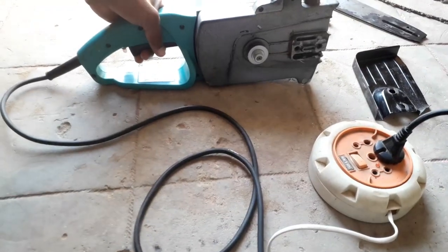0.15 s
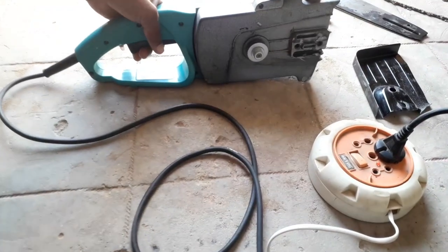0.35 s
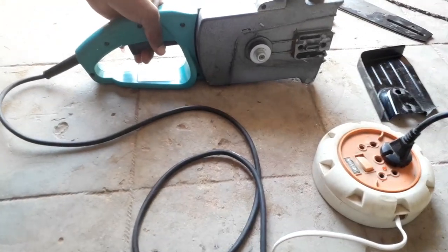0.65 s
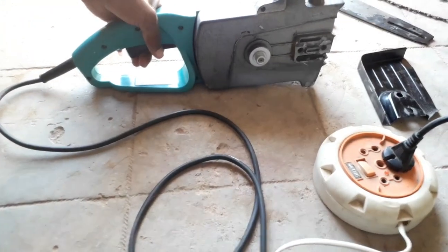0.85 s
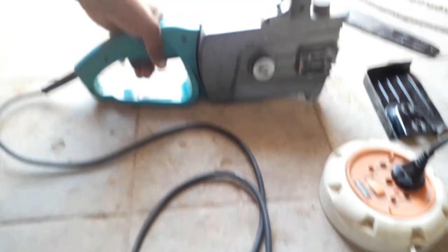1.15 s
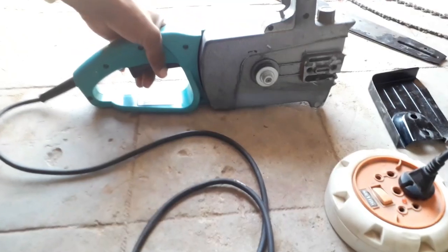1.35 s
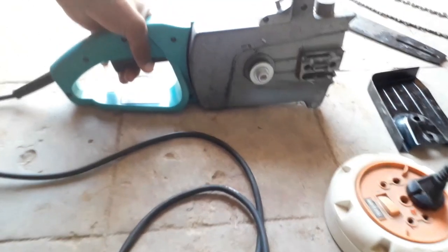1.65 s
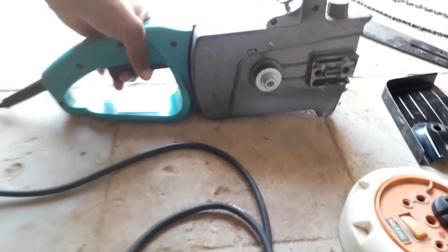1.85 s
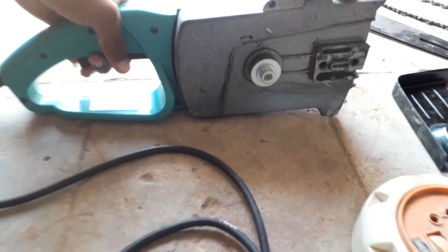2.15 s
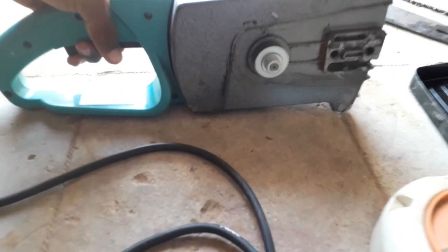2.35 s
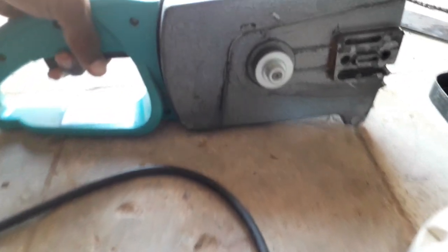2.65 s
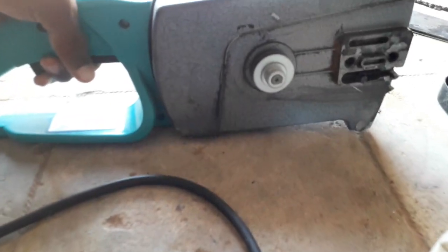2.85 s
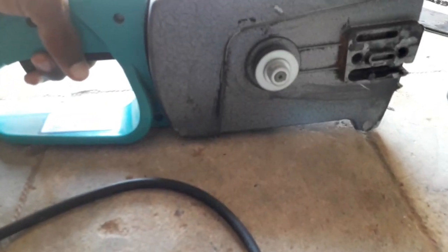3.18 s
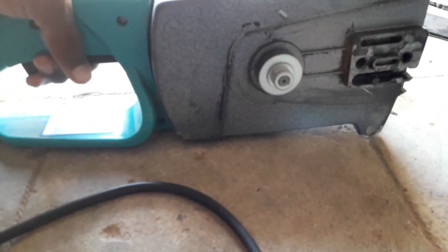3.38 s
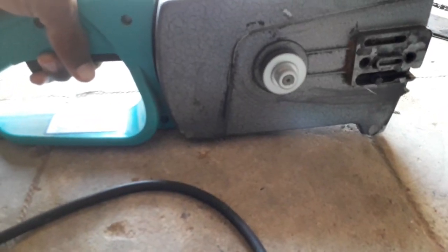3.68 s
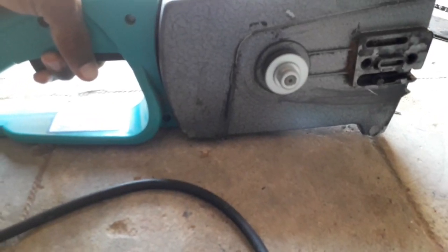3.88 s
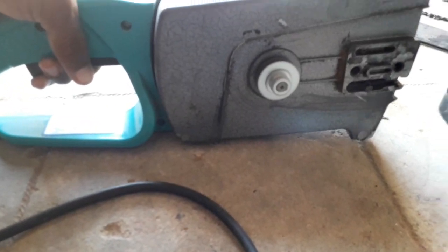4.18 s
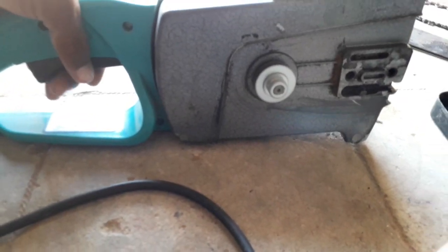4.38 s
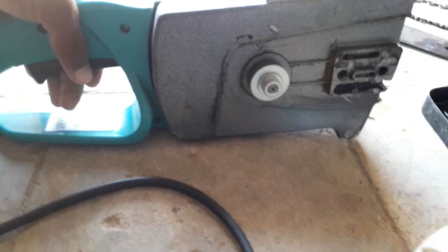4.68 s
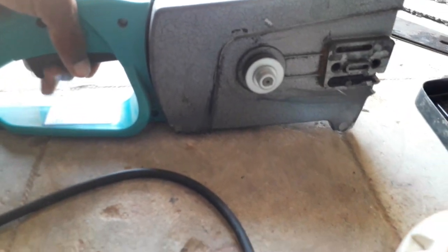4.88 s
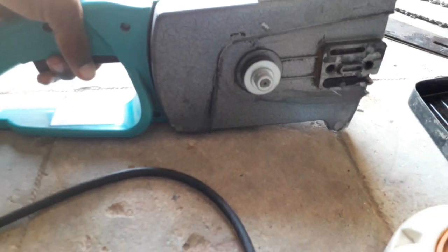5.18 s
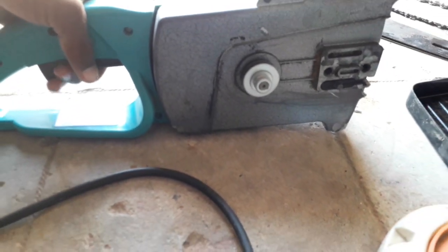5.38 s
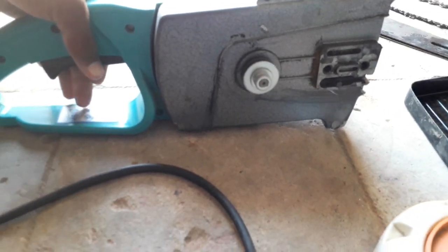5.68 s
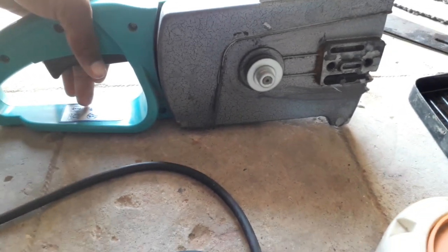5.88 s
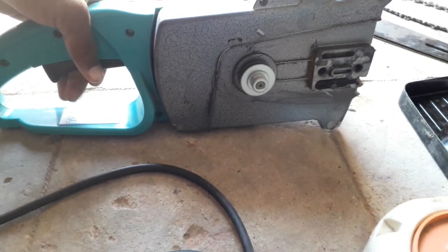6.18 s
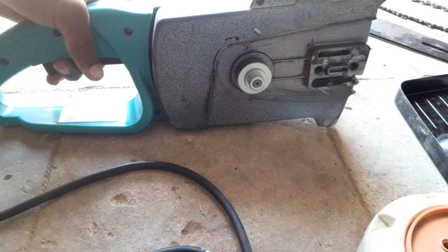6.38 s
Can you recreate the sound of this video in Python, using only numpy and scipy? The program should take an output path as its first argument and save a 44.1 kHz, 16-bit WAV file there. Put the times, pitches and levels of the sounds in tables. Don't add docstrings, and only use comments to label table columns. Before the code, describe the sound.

A mains saw motor runs free in a hard-walled room, heard by a close handheld microphone. First a falling whirr with bright irregular metallic clacks; then a sudden restart climbs to a fast, steady rush of fan air, gear rattle and thin whine, with a few soft low air puffs on the microphone. Released, it sinks in pitch and strength, and loose gear knocks return to the end. Short room reflections follow the clatter.

```python
import sys
import numpy as np
from scipy import signal
from scipy.io import wavfile
from scipy.ndimage import uniform_filter1d

SR = 44100
rng = np.random.default_rng(int(sys.argv[2]) if len(sys.argv) > 2 else 0)


def dump_mix(stems):
    frames = np.atleast_2d(stems).T
    limited = np.clip(frames, -1, 1)
    pcm = np.round(limited * 32767).astype(np.int16)
    wavfile.write(sys.argv[1], SR, pcm)


def voltage_ratio(decibels):
    exponent = np.asarray(decibels, float) / 20
    return 10 ** exponent


N = 288061
POWER_ON_S, POWER_OFF_S = 2.256, 4.281
TOP_TURNS_PER_S = 337


def rms_one(x):
    return x / np.sqrt(np.mean(x ** 2) + 1e-20)


def in_time(rows):
    s, value = np.transpose(rows)
    return np.interp(np.arange(N) / SR, s, value)


def drift(rate):
    r = np.exp(-80 * np.pi * rate / SR)
    slow = signal.lfilter([1], [1, -2 * r, r * r], rng.standard_normal(N // 40 + 2002))[2000:]
    return np.interp(np.arange(N) / 40, np.arange(len(slow)), rms_one(slow))


def decay(x, decay_s, gain=1):
    return signal.lfilter([gain], [1, -np.exp(-1 / (decay_s * SR))], x + 1e-18)


def resonance(x, hz, width_hz):
    r = np.exp(-np.pi * width_hz / SR)
    poles = [1, -2 * r * np.cos(2 * np.pi * hz / SR), r * r]
    return signal.lfilter(np.array([1, 0, -1]) * (1 - r * r) / 2, poles, x + 1e-18)


def bandpass(x, order, low_hz, high_hz):
    return signal.sosfilt(signal.butter(order, [low_hz, high_hz], "band", fs=SR, output="sos"), x)


def banded_noise(spectrum, patchy_db):
    hz, level_db = np.transpose(spectrum)
    edges = hz[0] * 2 ** np.arange(0, np.log2(hz[-1] / hz[0]), 1 / 3)
    together, white = drift(3.4), rng.standard_normal((2, N))
    out = 0
    for k, (low, high) in enumerate(zip(edges, edges[1:])):
        colour_db = np.interp(np.log(low * high) / 2, np.log(hz), level_db)
        flicker_db = patchy_db * (0.44 * together + drift(22))
        out = out + voltage_ratio(colour_db + flicker_db) * bandpass(white[k % 2], 2, low, high)
    return rms_one(out)


def coast(start_turns_per_s, s):
    equal_turns_per_s, rate_per_s = 171, .2125
    return equal_turns_per_s * np.tan(np.arctan(start_turns_per_s / equal_turns_per_s) - rate_per_s * s)


def speed_lack(s):
    surge_share, surge_s, settle_s = .332, .099, .4
    surge = (1 + s / surge_s) * np.exp(-s / surge_s)
    return surge_share * surge + (1 - surge_share) * np.exp(-s / settle_s)


def rotor():
    t, start_turns_per_s = np.arange(N) / SR, 163.5
    on_s, off_s = np.maximum(t - POWER_ON_S, 0), np.maximum(t - POWER_OFF_S, 0)
    restart = coast(start_turns_per_s, POWER_ON_S)

    def rise(s):
        return TOP_TURNS_PER_S - (TOP_TURNS_PER_S - restart) * speed_lack(s)

    powered = (t > POWER_ON_S) & (t < POWER_OFF_S)
    coasting = np.where(t <= POWER_ON_S, coast(start_turns_per_s, t),
                        coast(rise(POWER_OFF_S - POWER_ON_S), off_s))
    speed = np.where(powered, rise(on_s), coasting)
    return speed, uniform_filter1d(powered * speed_lack(on_s), size=800, origin=399)


# time [s], level [dB].
NEARNESS = [(0, 3.5), (.6, 3), (1.15, 5), (1.3, 3), (2.2, 4), (2.5, 1.8), (3.2, 0.46), (4.3, -0.57),
            (5.0, -0.5), (5.8, -1.9), (6.3, -3.5), (6.53, 3.5)]


def level(speed, torque, full_db, halving_db, torque_db, near_share):
    slowing_db = halving_db * np.log2(TOP_TURNS_PER_S / speed)
    return full_db - slowing_db + torque_db * torque + near_share * in_time(NEARNESS)


def wheel_angle(speed):
    pinion_teeth, wheel_teeth, high_side_s = 10, 59, (2.14, 6.015)
    turns = np.cumsum(speed) / SR
    first, second = turns[(np.array(high_side_s) * SR).astype(int)]
    zero = np.where(np.arange(N) < POWER_OFF_S * SR, first, second)
    return 2 * np.pi * (turns - zero) * pinion_teeth / wheel_teeth


# centre [Hz], width [Hz], level for a knock [dB], level for the rattle [dB].
HOUSING = [(1124, 104, -11.5, -9), (1490, 104, -3, -9), (1812, 463, -2.5, -2.5), (2480, 990, -3, -2),
           (3217, 453, 3, 3.5), (3950, 443, 4, 4.5), (4992, 790, 6.5, 3.5), (5400, 800, 5.5, -4),
           (6320, 475, -2.5, -5.5), (7040, 290, -7, -3.5), (8370, 1360, -8.5, -9.5), (9720, 690, -5.5, -7),
           (10830, 2800, -15, -13.5)]


def housing(blows, column):
    rings = 0
    for k, (x, mode) in enumerate(zip(blows, HOUSING)):
        rings = rings + (-1) ** k * voltage_ratio(mode[column]) * resonance(x, *mode[:2])
    return bandpass(rings, 2, 900, 10650)


def rattle(speed, rattle_db):
    t, mains_hz, runout_db, mains_db = np.arange(N) / SR, 50, 1.1, 1.5
    powered = (t > POWER_ON_S) & (t < POWER_OFF_S)
    swing_db = runout_db * np.log2(TOP_TURNS_PER_S / speed) * np.cos(wheel_angle(speed))
    swing_db += mains_db * powered * np.cos(4 * np.pi * mains_hz * t)
    swing_db += 0.5 * drift(45)
    born = rng.random(N) < 41 * speed / SR
    sizes = voltage_ratio(2.5 * np.minimum(rng.exponential(1, N), 3)) * rng.choice([-1, 1], N)
    contacts = born * sizes / np.sqrt(speed) * voltage_ratio(swing_db)
    rubbing = .5 * rng.standard_normal(N)
    return voltage_ratio(rattle_db) * rms_one(housing([rms_one(contacts) + rubbing] * len(HOUSING), 3))


# time [s], peak level [dB].
HARD_KNOCKS = [(0.2449, 0), (0.2579, 1), (0.3287, 0), (0.3696, 0), (0.4509, 0), (0.7447, -1),
               (0.7519, -1), (0.8859, 1), (0.8984, -1), (0.9388, -3), (1.062, -1), (1.1243, 0),
               (1.1648, -1), (1.1914, 0), (1.1974, 0), (1.3728, -2), (1.4436, -2), (1.4541, -1),
               (1.517, -1), (1.5808, -1), (1.6487, -3), (1.6741, 0), (1.7414, 0), (1.8163, -1),
               (1.8337, -2), (2.0248, -1), (2.0408, 1), (2.1171, -3), (2.1385, 0), (2.164, -4),
               (2.2333, -3), (2.2503, -2), (2.2847, 0), (2.3156, 1), (2.3344, 1), (2.3864, 1),
                   (2.4044, 1), (2.4473, 1), (5.235, -1), (5.2804, 0), (5.3014, -1), (5.3517, -2),
                   (5.5593, 0), (5.6481, -1), (5.664, 0), (5.7224, 0), (5.7364, -1), (5.7997, 1),
                   (5.8074, -1), (5.8306, 0), (5.8995, 0), (5.9125, -1), (5.9454, 1), (5.9768, -3),
                   (6.0132, 1), (6.0935, -2), (6.1484, 1), (6.4088, -3), (6.4664, -3), (6.5106, 0)]


def knock_times(speed, torque):
    knocks_per_s, jitter_turns, spread_db, top_db = 80, .16, 2.3, -8
    wheel_swing_db, torque_db, meshed_s = 2.0, 6.0, 2.75
    turns = np.cumsum(speed) / SR
    count = int(turns[-1])
    luck = rng.random(count)
    jitter, size = rng.standard_normal((2, count))
    at = np.interp(np.arange(count) + .5 + jitter_turns * jitter, turns, np.arange(N)).astype(int)
    swing_db = wheel_swing_db * np.log2(TOP_TURNS_PER_S / speed) * (np.cos(wheel_angle(speed)) - .5)
    usual_db = level(speed, torque, full_db=-6.5, halving_db=1.3, torque_db=torque_db, near_share=0.2)
    peak_db = (usual_db + swing_db)[at] + spread_db * size
    peak_db = np.minimum(peak_db, top_db + torque_db * torque[at])
    hard_s, hard_db = np.transpose(np.array(HARD_KNOCKS))
    s = at / SR
    free = np.abs(s[:, None] - hard_s).min(axis=1) > .005
    loose = (s < meshed_s) | (s > POWER_OFF_S)
    keep = free & loose & (luck < knocks_per_s / speed[at])
    return np.r_[s[keep], hard_s + .001], np.r_[peak_db[keep], hard_db - 3.2]


def knocks(s, peak_db):
    gain_db, bounce_s, bounce_db = 4, .0009, -2
    at = np.clip(((s - .0007) * SR).astype(int), 18, N - 99)
    draws = rng.standard_normal((len(s), len(HOUSING) + 2))
    strengths = voltage_ratio(peak_db + gain_db) * voltage_ratio(1.5 * draws[:, 2:]).T
    bounce = at + (bounce_s * SR * (1 + .1 * draws[:, 0])).astype(int)
    blows = np.zeros((len(HOUSING), N))
    blows[:, at] = strengths
    blows[:, at - 18] = .2 * strengths
    blows[:, bounce] = strengths * voltage_ratio(bounce_db + 1.5 * draws[:, 1])
    shiver = decay(blows.mean(axis=0), .003, .02)
    blows += shiver * rng.standard_normal(N)
    unit_peak = np.abs(housing([signal.unit_impulse(512)] * len(HOUSING), 2)).max()
    return housing(blows, 2) / unit_peak


# delay [s], level [dB].
ECHOES = [(.0024, -12), (.0066, -12), (.0095, -15)]


def room(x):
    t60_s, tail_db, wall_cut_hz = .3, -13, 4500
    out, dull = x.copy(), np.exp(-2 * np.pi * wall_cut_hz / SR)
    for delay_s, level_db in ECHOES:
        lag = round(delay_s * SR)
        out[lag:] += voltage_ratio(level_db) * x[:-lag]
    for k, lag in enumerate((rng.uniform(0.0098, .035, 8) * SR).astype(int)):
        loop, gain, state = x.copy(), voltage_ratio(-60 * lag / SR / t60_s), [0.]
        for i in range(lag, N, lag):
            back, state = signal.lfilter([gain * (1 - dull)], [1, -dull], loop[i - lag:i], zi=state)
            loop[i:i + lag] += back[:N - i]
        out += voltage_ratio(tail_db) * (loop - x) * (-1) ** k
    return out


def gears(speed, torque):
    knock_room_share = .55
    blows = knocks(*knock_times(speed, torque))
    rattle_db = level(speed, torque, full_db=-9.5, halving_db=4.5, torque_db=8.5, near_share=0.64)
    to_room = voltage_ratio(-7.0) * rattle(speed, rattle_db) + knock_room_share * blows
    return room(to_room) + (1 - knock_room_share) * blows


# frequency [Hz], density [dB per Hz].
ROAR = [(15, -61), (25, -78), (64, -26), (231, -10.5), (325, -8), (374, -3), (438, -2.5), (884, -5),
        (2090, -7.5), (2220, -35), (3000, -8), (3900, -30), (6600, -120)]


def fan_roar(roar_db):
    return voltage_ratio(roar_db + 2.0) * banded_noise(ROAR, patchy_db=0.13)


# centre [Hz], width [Hz], level over the roar when coasting [dB].
SHELL = [(462, 43, -1), (602, 91, 1)]


def shell(speed, roar_db):
    coasting = np.clip(1.2 - speed / speed.max(), 0, 1)
    out = 0
    for hz, width_hz, level_db in SHELL:
        hollow = rms_one(resonance(rng.standard_normal(N), hz, width_hz))
        out = out + voltage_ratio(roar_db + level_db) * coasting * hollow
    return out


# frequency [Hz], density [dB per Hz].
HISS = [(1470, -76), (2500, -19.5), (3010, -2.5), (5350, -2), (6010, -16), (7470, -8), (11600, -15.5),
        (14900, -20.5), (16000, -28)]


def fan_hiss(speed, torque):
    hiss_db = level(speed, torque, full_db=-20.5, halving_db=16, torque_db=0, near_share=1.4)
    return voltage_ratio(hiss_db + 11.5) * banded_noise(HISS, patchy_db=0.5)


def lit_db(hz, peaks):
    return sum(boost_db / (1 + (2 * (hz - top_hz) / width_hz) ** 2) for top_hz, width_hz, boost_db in peaks)


# centre [Hz], width [Hz], boost [dB].
FLOOR_PANEL = [(127, 13, 21), (150, 30, -5), (188, 35, 8)]


def hum(speed):
    phase = 2 * np.pi * np.cumsum(speed) / SR
    hum_db = -32 - 22 * np.log2(speed.max() / speed) + lit_db(speed, FLOOR_PANEL)
    return np.sqrt(2) * voltage_ratio(hum_db + 1.5 * drift(6)) * np.sin(phase)


# cycles per turn, level at full speed [dB], loss per halving of speed [dB].
WHINES = [(32, -38, 1.5), (36, -33.5, 14), (48, -39, 11), (64, -39.5, 1.5), (96, -38, 7)]
# centre [Hz], width [Hz], boost [dB].
WHINE_PEAKS = [(4800, 900, 6), (6150, 400, 9), (9000, 450, 10), (10100, 600, 6), (11600, 500, 3),
               (15000, 6000, -11)]
# time [s], level
# [dB].
BRUSH_END = [(0, 3), (.38, 6), (.55, 3), (2.36, -1), (2.52, 12), (2.75, 2), (3.1, 4), (4.45, 4), (4.7, -2),
             (5.3, -3), (5.5, 1), (5.65, -5), (6.53, -4)]


def whines(speed):
    phase = 2 * np.pi * np.cumsum(speed) / SR
    halvings, trim_db = np.log2(speed.max() / speed), in_time(BRUSH_END)
    out = np.zeros(N)
    for cycles, level_db, halving_db in WHINES:
        hz = cycles * speed
        line_db = level_db + trim_db - halving_db * halvings + lit_db(hz, WHINE_PEAKS) + 2.5 * drift(25)
        out += voltage_ratio(line_db) * (hz < .4 * SR) * np.sin(cycles * phase + 1.5 * drift(20))
    return np.sqrt(2) * out


# time [s], peak level [dB].
PUFFS = [
    (3.199, -23),
    (3.399, -35),
    (3.589, -28),
    (3.659, -28),
    (5.559, -42),
]


def puffs():
    starts = np.zeros(N)
    for s, peak_db in PUFFS:
        starts[round(s * SR)] = voltage_ratio(peak_db + 1)
    shape = signal.lfilter([.005], [1, -.995], decay(starts, 0.011))
    return rms_one(resonance(rng.standard_normal(N), 80, 120)) * shape


# frequency [Hz], density [dB per Hz].
BACKGROUND = [(18, -38), (30, -25), (97, 2), (183, 17), (268, -20), (400, -18), (520, -32), (880, -120)]


def background():
    return voltage_ratio(-57 - 0.5) * banded_noise(BACKGROUND, patchy_db=5.0)


def scene():
    speed, torque = rotor()
    roar_db = level(speed, torque, full_db=-22.5, halving_db=12, torque_db=4.5, near_share=0.45)
    air = fan_roar(roar_db) + shell(speed, roar_db) + fan_hiss(speed, torque) + puffs()
    lines = hum(speed) + whines(speed)
    return np.tile(gears(speed, torque) + air + lines + background(), (2, 1))


def roll_off(x):
    return signal.sosfilt(signal.butter(12, 16340, fs=SR, output="sos"), x)


def record(dry):
    squeezed = 1.2 * np.tanh(dry / 1.2)
    cut = signal.sosfilt(signal.cheby2(24, 60, 15850, fs=SR, output="sos"), squeezed)
    return roll_off(cut)


dry = scene()
out = record(dry)
dump_mix(out)
```